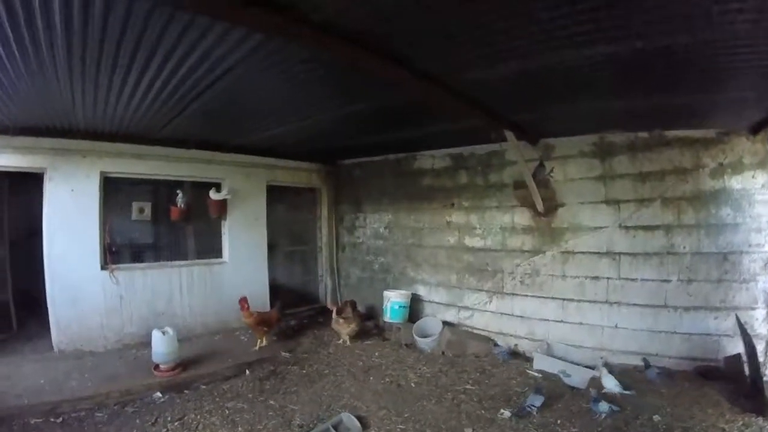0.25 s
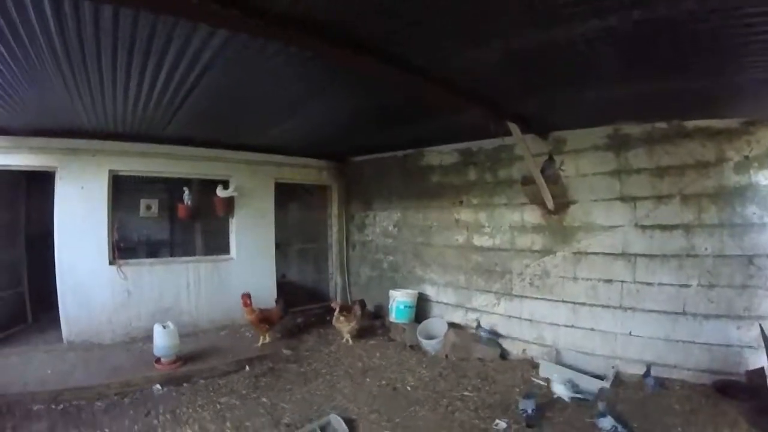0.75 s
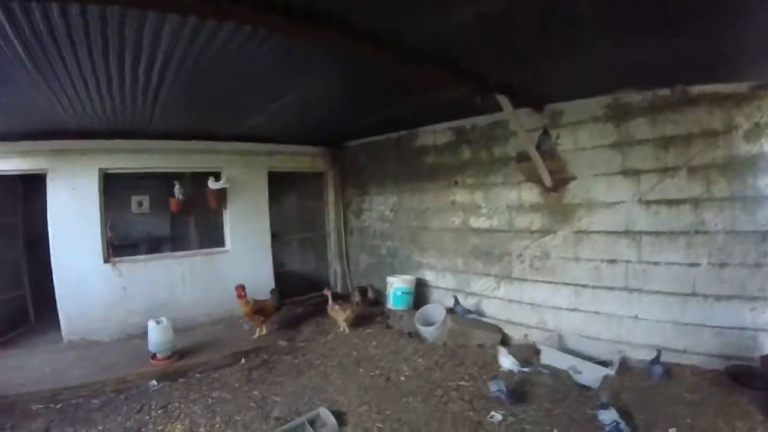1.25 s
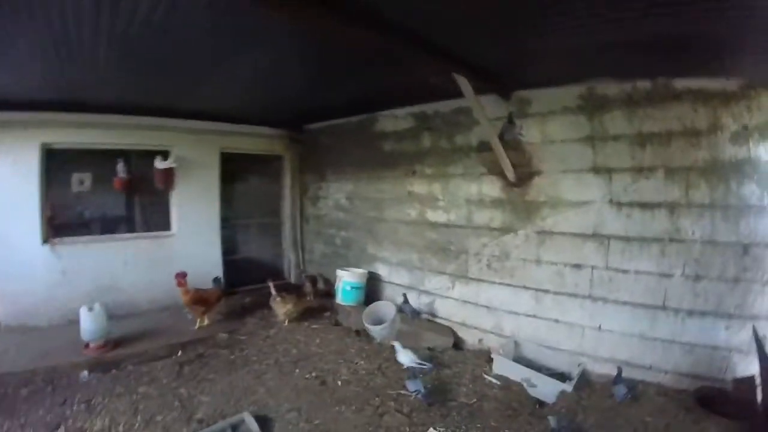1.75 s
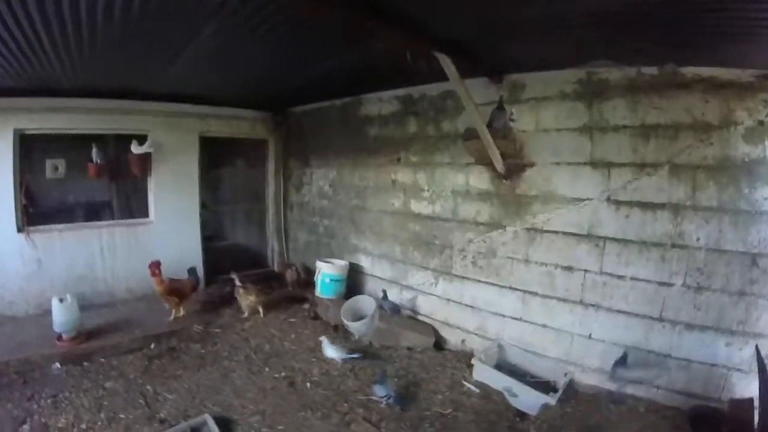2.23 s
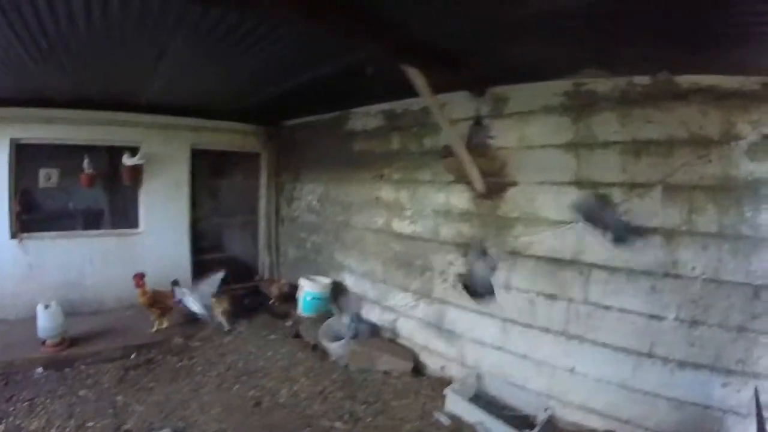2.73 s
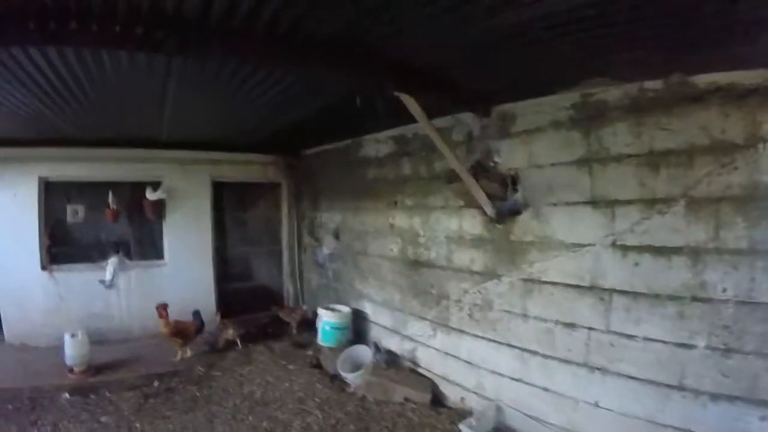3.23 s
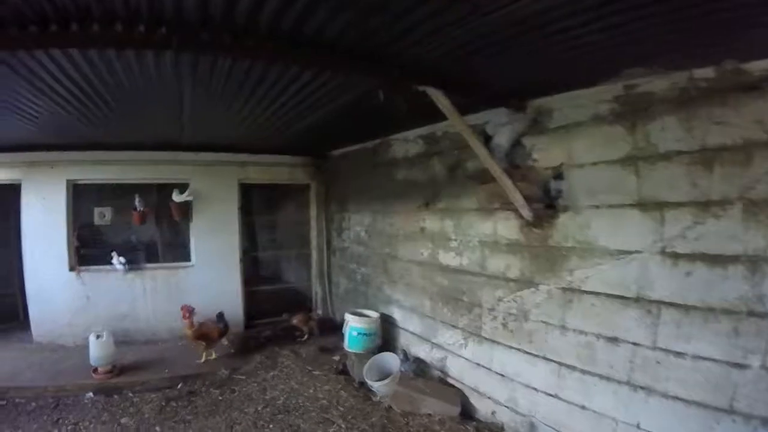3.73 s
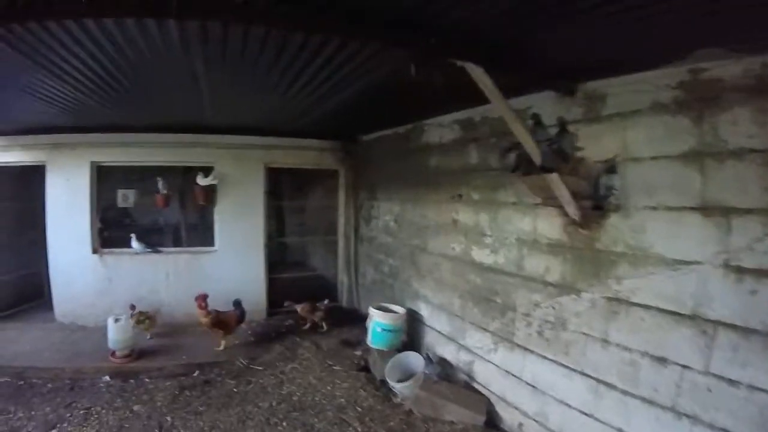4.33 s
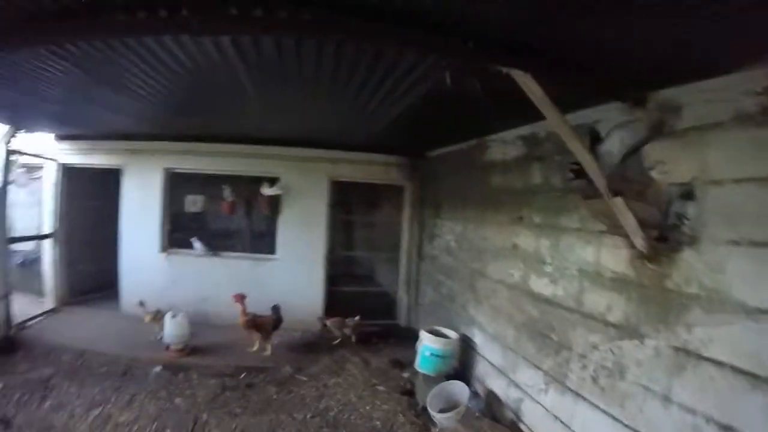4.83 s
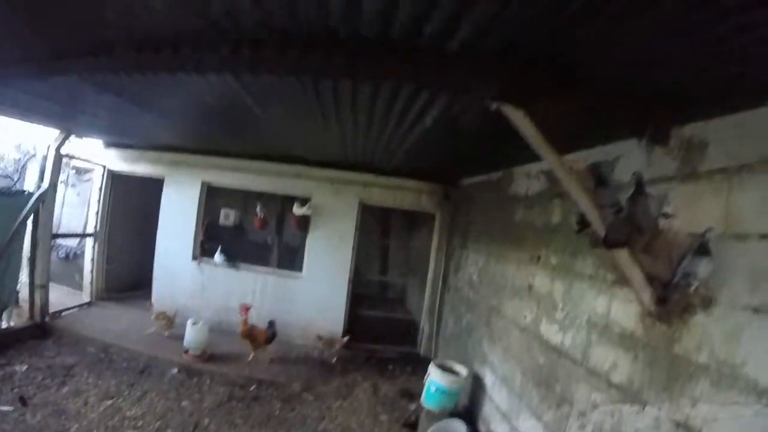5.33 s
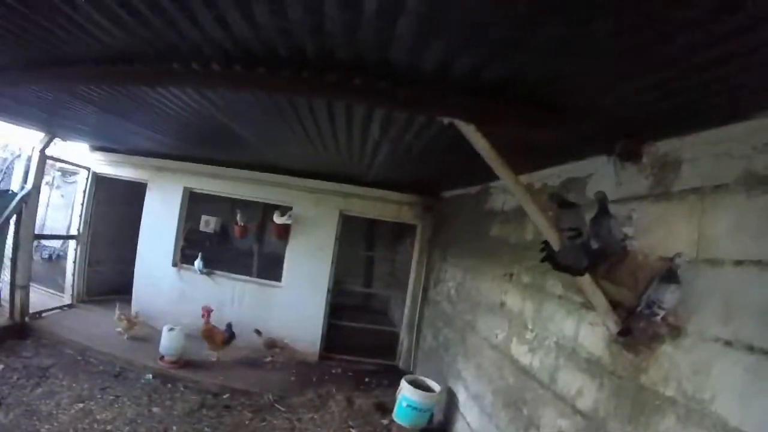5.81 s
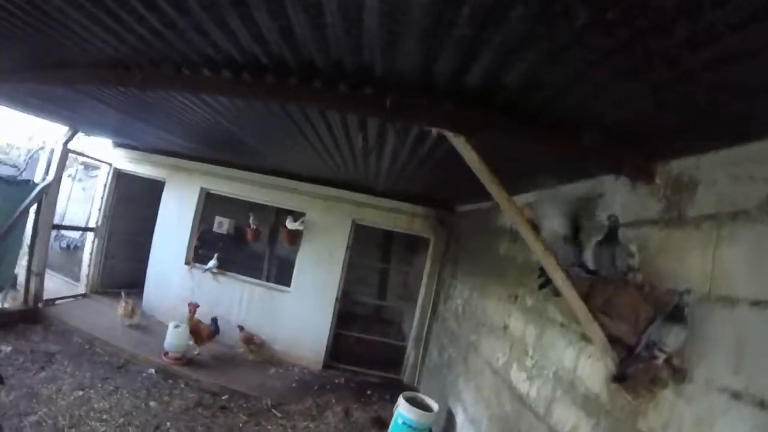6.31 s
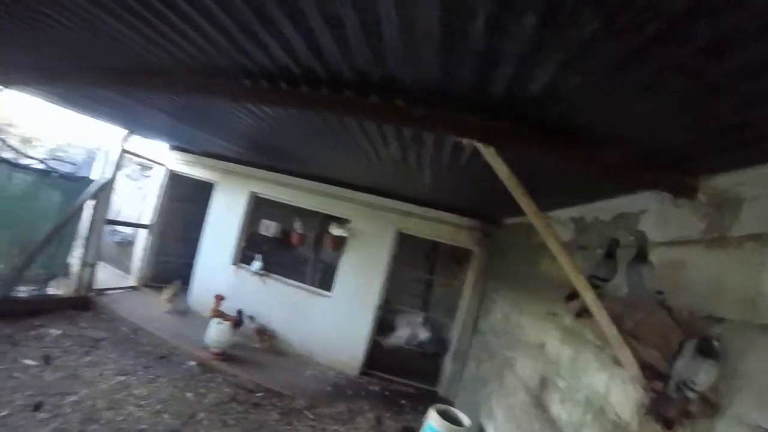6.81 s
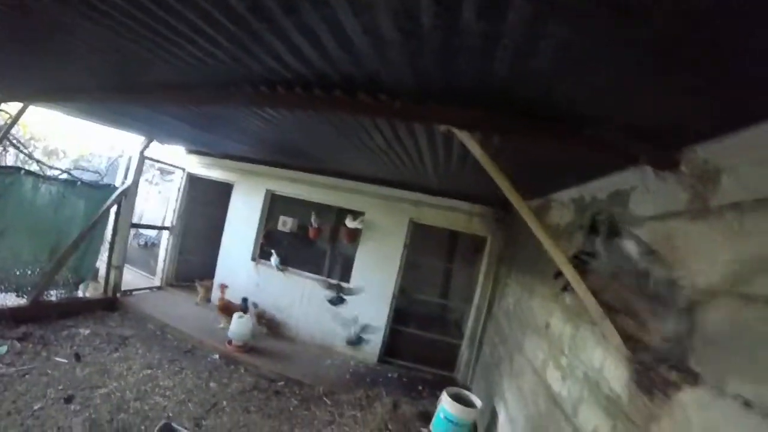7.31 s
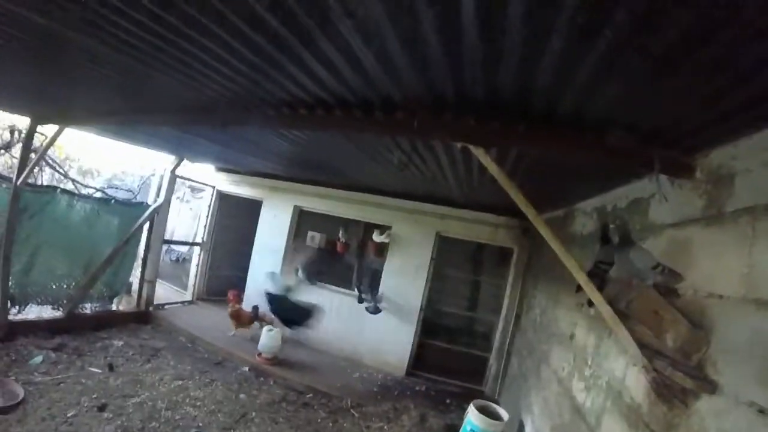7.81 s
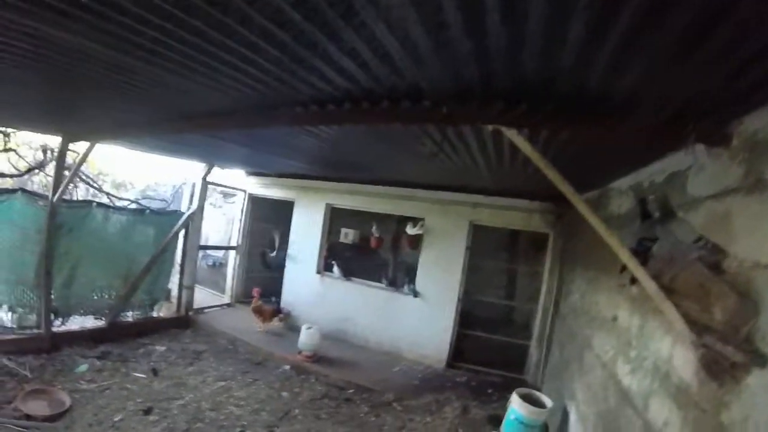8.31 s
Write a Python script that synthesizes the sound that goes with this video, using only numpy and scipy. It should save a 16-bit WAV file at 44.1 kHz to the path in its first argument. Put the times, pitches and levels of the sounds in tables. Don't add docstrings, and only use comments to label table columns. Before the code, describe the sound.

Quiet hum and faint ticks, then a rush of flapping pigeon wings, a lull with scratches and soft grunts, and a closer, heavier flurry thumping the microphone.

```python
import sys
import numpy as np
from scipy import signal
from scipy.fft import rfft, irfft
from scipy.io import wavfile
from scipy.ndimage import uniform_filter1d

SR = 44100
rng = np.random.default_rng(int(sys.argv[2]) if len(sys.argv) > 2 else 0)


def invert_db(x):
    u = np.asarray(x, float) / 20
    return 10 ** u


def wrap_up_sound(samples):
    columns = np.atleast_2d(samples).T
    tamed = np.clip(columns, -1, 1)
    steps = np.round(tamed * 32767).astype(np.int16)
    wavfile.write(sys.argv[1], SR, steps)


N = 377055


def at_hz(points, hz):
    point_hz, point_db = np.transpose(points)
    return np.interp(np.log(hz + 1), np.log(point_hz), point_db)


def band(x, low_hz, high_hz, order=2):
    edges_hz = [low_hz, min(high_hz, 0.45 * SR)]
    return signal.sosfilt(signal.butter(order, edges_hz, "band", fs=SR, output="sos"), x)


def colour(x, curve):
    n = x.shape[-1]
    return irfft(rfft(x) * invert_db(at_hz(curve, np.fft.rfftfreq(n, 1 / SR))), n)


def housed(x):
    # pitch_hz, level_db [dB per Hz]
    housing_curve = [(20, 3), (100, -1), (160, -8), (480, -9), (800, -5.5), (950, -6.5), (1150, -22),
                     (1400, -24.5), (2200, -17), (2900, -32), (3750, -28.5), (8200, -36.5), (9500, -42),
                     (13000, -41), (15500, -51)]
    return colour(x, housing_curve)


def drift(rate_hz):
    knots_per_s = 200
    knots = rng.standard_normal(int(N / SR * knots_per_s) + 202)
    smooth = signal.butter(1, min(rate_hz, 90), fs=knots_per_s, output="sos")
    slow = signal.sosfiltfilt(smooth, knots)[100:-100]
    return np.interp(np.arange(N) / SR * knots_per_s, np.arange(len(slow)), slow / slow.std())


def swell(t, rise_s, t60_s):
    rise = np.sin(np.pi / 2 * np.clip(t / rise_s, 0, 1)) ** 2
    return rise * invert_db(-60 * np.maximum(t - rise_s, 0) / t60_s)


def hump(t, length_s, skew):
    return np.sin(np.pi * (t / length_s) ** skew)


def seconds(length_s):
    return np.arange(int(length_s * SR)) / SR


def add(out, s, sound, peak_db):
    i = max(round(s * SR), 0)
    out[i:i + len(sound)] += (invert_db(peak_db) * sound / np.abs(sound).max())[:N - i]


def strokes():
    # middle_s, peak_db, boom_hz, body_db [re boom], length_s
    take_off = [(2.208, -20.5, 776, -33, 0.014), (2.292, -35, 843, -12, 0.021),
                (2.319, -26.5, 810, -14, 0.014), (2.33, -28, 906, -22, 0.015),
                (2.366, -20.5, 700, -30, 0.014), (2.386, -30, 770, -5, 0.016), (2.423, -32, 702, -9, 0.027),
                (2.484, -22.5, 748, -27, 0.022), (2.518, -20, 759, -12, 0.016),
                (2.532, -23.5, 785, -19, 0.013), (2.555, -26.5, 814, -15, 0.017),
                (2.57, -30, 820, -18, 0.012), (2.584, -19, 781, -27, 0.021), (2.639, -23, 844, -23, 0.014),
                (2.655, -20.5, 792, -27, 0.019), (2.684, -38, 820, -21, 0.016),
                (2.701, -15.5, 793, -37, 0.032), (2.724, -32, 786, -23, 0.022),
                (2.768, -23.5, 698, -26, 0.017), (2.778, -26.5, 810, -29, 0.019),
                (2.809, -25.5, 750, -23, 0.017), (2.873, -30, 809, -8.5, 0.03),
                (2.885, -31, 818, -13, 0.016), (2.919, -28.5, 818, -12.5, 0.034),
                (2.956, -37, 766, -21, 0.015), (2.999, -30, 791, -16, 0.015), (3.042, -30, 743, -18, 0.012),
                (3.109, -33, 735, -15, 0.014), (3.138, -28.5, 812, -22, 0.017),
                (3.147, -28.5, 815, -17, 0.011), (3.177, -32, 795, -22, 0.011),
                (3.246, -32.5, 850, -15, 0.021), (3.259, -33, 826, -4.5, 0.012),
                (3.269, -35, 782, -12, 0.017), (3.297, -39, 789, 4, 0.01), (3.422, -25.5, 741, -22, 0.012),
                (3.481, -33, 824, -9, 0.016), (3.597, -25.5, 841, -28, 0.018),
                (3.771, -34.5, 687, -18, 0.022), (3.886, -37.5, 737, -11, 0.012)]
    fly_past = [(6.344, -22.5, 883, -24, 0.024), (6.355, -27, 875, -19, 0.012),
                (6.45, -14.5, 851, -22, 0.022), (6.469, -23, 872, -29, 0.023),
                (6.505, -26, 826, -8.5, 0.014), (6.524, -24, 802, -5.5, 0.01),
                (6.64, -26.5, 771, -1.5, 0.012), (6.863, -32, 838, -13, 0.018),
                (6.947, -33, 867, -16, 0.015), (6.975, -29, 830, -10.5, 0.011),
                (7.038, -32, 756, -16, 0.011), (7.092, -28, 647, -15, 0.013), (7.172, -39, 758, -21, 0.013),
                (7.22, -24.5, 790, -27, 0.03), (7.286, -30, 753, -16, 0.022), (7.311, -32, 820, -18, 0.012),
                (7.332, -28.5, 785, -16, 0.013), (7.347, -32, 781, -15, 0.017),
                (7.379, -26, 821, -9, 0.022), (7.432, -32.5, 860, -23, 0.012),
                (7.45, -25.5, 847, -9.5, 0.013), (7.499, -25, 713, -12, 0.011),
                (7.509, -19, 790, -25, 0.011), (7.531, -21.5, 702, -17, 0.013),
                (7.551, -27, 824, -21, 0.019), (7.566, -28, 842, -5, 0.026),
                (7.614, -19.5, 823, -25, 0.011), (7.619, -23, 763, -26, 0.017),
                (7.663, -27, 700, -9, 0.011), (7.668, -26, 737, -18, 0.011), (7.687, -21, 855, -23, 0.012),
                (7.703, -35, 817, -14, 0.028), (7.727, -21.5, 810, -28, 0.022),
                (7.761, -35, 803, -15, 0.026), (7.785, -27, 770, -15, 0.012),
                (7.804, -27.5, 897, -11, 0.021), (7.841, -30, 739, -20, 0.017),
                (7.976, -34, 750, -7, 0.014), (8.077, -29.5, 766, -12, 0.012), (8.19, -31, 682, -21, 0.017)]
    # middle_s, peak_db, boom_hz, body_db [re boom], length_s
    flicks = [
        (.532, -35.5, 603, -14, .04),
        (0.542, -34.5, 807, -16, .014),
        (1.042, -38, 718, -7, .016),
        (1.298, -33.5, 774, -10, 0.022),
        (1.76, -37, 843, -16, .02),
        (1.81, -32, 800, -17, .01),
        (1.821, -37, 794, -12, .012),
              (2.357, -27, 760, -20, .018), (2.469, -27.5, 780, -20, .018),
                (3.977, -38.5, 806, -12, .027), (4.024, -40, 730, -14, .013), (4.09, -30, 798, -25, .034),
                (4.201, -36, 822, -16, .012), (4.224, -35, 830, -16, .014), (4.273, -33, 789, -15, .017),
                (4.352, -36, 840, -22, .025), (4.383, -31, 729, -23, .034), (4.901, -29, 658, -20, .021),
                (5.197, -27.5, 814, -28, .024), (5.225, -38, 713, -15, .02)]
    landing = [
        (8.319, -36.5, 693, -26, 0.047),
        (8.433, -35, 688, -15, .03),
        (8.454, -35, 735, -21, .03),
        (8.529, -39, 758, -7, 0.032),
    ]
    rows = take_off + fly_past + flicks + landing
    out, t = np.zeros(N), np.arange(4096) / SR
    air = housed(rng.standard_normal((len(rows), 3, len(t))))
    for (middle_s, db, hz, body_db, length_s), (boom_air, body_air, rustle_air) in zip(rows, air):
        length_s = 1.2 * length_s
        start_s = middle_s - 0.5 * length_s
        shape = np.sin(np.pi * np.minimum(t / length_s, 1)) ** 3
        rough = band(boom_air, hz - 150, hz + 150)
        phase = 2 * np.pi * hz * t * (1 + 0.022 * (1 - t / length_s))
        boom = np.sin(phase) + 0.22 * rough / rough.std()
        add(out, start_s, boom * shape, db - 0.5)
        add(out, start_s, band(body_air, 169, 514) * shape, db + body_db + 9.0)
        add(out, start_s, band(rustle_air, 1000, 3600) * shape, db - 12.5)
    return out


def ticks():
    # start_s, peak_db
    claps = [(2.2062, -24.5), (2.429, -32), (2.4766, -28.5), (2.8338, -38), (2.8958, -31), (3.1448, -37),
             (3.176, -32.5), (3.3708, -35.5), (3.6533, -32.5), (3.7674, -41), (3.8695, -37), (6.5, -26),
             (6.525, -23), (6.6382, -20.5), (6.7541, -33), (6.838, -28.5), (6.87, -34), (7.0605, -38),
             (7.459, -25), (7.4881, -14), (7.575, -28.5), (7.753, -31.5), (7.8034, -34), (8.176, -44)]
    # start_s, peak_db
    knocks = [
        (2.315, -30.5),
        (3.023, -37.5),
        (3.105, -34.5),
        (3.429, -36),
        (3.5396, -34.5),
        (4.232, -41),
        (4.7741, -48),
    ]
    # start_s, peak_db
    scratches = [(2.3337, -28), (2.385, -29), (2.7673, -24.5), (3.97, -34), (4.016, -39), (4.0583, -40),
                 (4.0797, -30.5), (4.125, -35.5), (4.169, -42), (4.208, -40), (4.272, -38.5), (4.51, -41.5),
                 (4.5488, -35), (6.3642, -38), (6.4424, -16.5), (6.944, -36), (7.638, -30.5), (7.6794, -23)]
    # start_s, peak_db
    snaps = [
        (2.6044, -33),
        (2.653, -28.5),
        (2.951, -40),
        (3.636, -44),
        (4.344, -40),
        (7.379, -17.5),
    ]
    # start_s, peak_db
    swishes = [
        (1.724, -34.5),
        (7.312, -30),
        (7.333, -24.5),
        (7.3533, -25),
        (7.3735, -28),
        (7.396, -31),
        (8.008, -33.5),
    ]
    # low_db [re peak], top_db [re peak], t60_s
    kinds = [
        (-2.5, -28, 0.03),
        (5.5, -23, 0.042),
        (-8.5, -35, .045),
        (-13, -13, 0.036),
        (-9, -20, 0.048),
    ]
    rows = []
    for hits, kind in zip([claps, knocks, scratches, snaps, swishes], kinds):
        rows += [(*hit, *kind) for hit in hits]
    out, t = np.zeros(N), np.arange(4000) / SR
    air = housed(rng.standard_normal((len(rows), 3, len(t))))
    grain = uniform_filter1d(rng.standard_normal((len(rows), len(t))), size=49) * 7
    for (s, db, low_db, top_db, t60_s), (middle_air, top_air, low_air), crackle in zip(rows, air, grain):
        rise_s = max(0.2 * t60_s - 0.002, 0.0006)
        shape = swell(t, rise_s, max(t60_s, 0.004)) * invert_db(3.65 * crackle)
        add(out, s - 0.6 * rise_s, band(middle_air, 2580, 11050) * shape, db - 2.5)
        add(out, s - 1.2 * rise_s, band(top_air, 6800, 14600) * shape, db + top_db + 7.0)
        add(out, s - 0.598 * rise_s, band(low_air, 1794, 2430) * shape, db + low_db - 2.5)
        knock = band(low_air, 240, 1230) * swell(t, 0.00089, 0.012)
        add(out, s - 0.599 * rise_s, knock, db + low_db - 0.5)
    return out


def grunts():
    # start_s, peak_db, pitch_hz, length_s, fall [share of pitch lost]
    throat_notes = [
        (5.711, -40.5, 786, 0.015, -0.00074),
        (5.73, -39.5, 890, 0.019, .05),
        (5.808, -27.5, 733, 0.032, 0.2),
        (5.935, -24, 684, 0.027, 0.036),
        (5.948, -24, 640, 0.018, 0.17),
        (5.966, -30, 610, 0.023, 0.08),
        (6.077, -28.5, 720, 0.013, 0.037),
        (6.089, -32.5, 584, 0.023, -0.003),
        (6.209, -28.5, 668, 0.028, -.08),
        (6.225, -34, 608, 0.029, 0.049),
    ]
    # start_s, peak_db, pitch_hz, length_s
    sac_hums = [
        (4.896, -35, 318, 0.019),
        (5.711, -38, 390, 0.038),
        (5.812, -36.5, 341, 0.038),
        (5.951, -33.5, 360, 0.037),
        (6.116, -39.5, 272.3, 0.05),
        (6.222, -36.5, 403, 0.074),
    ]
    housing_hz, housing_db = 900, -8.5
    out = np.zeros(N)
    air = rng.standard_normal((len(throat_notes), 2, 6000))
    for (s, db, hz, length_s, fall), breath in zip(throat_notes, air):
        t = seconds(length_s)
        waver = band(breath, 13, 100)[:, -len(t):]
        main, housing_waver = 1 + 0.25 * waver / waver.std()
        tone = main * np.sin(2 * np.pi * hz * (t - fall / 2 * t ** 2 / length_s))
        tone = tone + invert_db(housing_db) * housing_waver * np.sin(2 * np.pi * housing_hz * t)
        add(out, s - 0.002, tone * hump(t, length_s, 0.59), db + 0.5)
    sighs = band(rng.standard_normal((len(sac_hums), 6000)), 20, 90)
    for (s, db, hz, length_s), sigh in zip(sac_hums, sighs / sighs.std()):
        t = seconds(length_s)
        hum = (1 + 0.5 * sigh[-len(t):]) * np.sin(2 * np.pi * hz * t)
        add(out, s, hum * hump(t, length_s, 0.45), db - 0.5)
    return out


def pushes():
    # start_s, peak_db
    gusts = [(2.298, -33.5), (2.474, -37), (2.806, -33), (3.91, -29.5), (6.366, -31), (6.499, -32),
             (6.524, -39), (6.69, -31), (6.733, -25), (6.804, -35), (6.922, -24), (7.273, -26), (7.51, -23),
             (7.611, -20), (7.698, -25), (7.775, -32), (7.907, -24.5), (8.02, -20), (8.132, -26),
             (8.247, -34), (8.373, -30)]
    out, push_hz = np.zeros(N), 48.4
    u = np.linspace(-3, 3, int(1.6 * SR / push_hz))
    for s, db in gusts:
        add(out, s, -u * np.exp(-u ** 2 / 2), db - 7.0)
    return out


def rings():
    # start_s, peak_db, pitch_hz, length_s
    plastic_notes = [(0.01, -60, 3760, 0.18), (3.955, -44, 4070, .01), (3.985, -44, 6300, .012),
                     (4.056, -43, 6000, .014), (4.086, -42, 3850, .016), (4.169, -46, 4200, 0.013),
                     (2.333, -34, 3920, 0.0068), (0.514, -41, 1770, 0.033), (2.9, -44, 6060, .015),
                     (3.968, -37, 4150, 0.008), (3.972, -43, 6000, .012), (3.973, -37, 2163, 0.024),
                     (4.014, -36, 4090, 0.01), (4.014, -40.5, 5080, 0.017), (4.204, -32, 2046, 0.016),
                     (4.232, -43, 4600, 0.0098), (4.272, -43, 5180, 0.012), (4.545, -46, 4022, 0.011),
                     (6.333, -22.5, 949, 0.047), (1.805, -34, 2320, 0.0068), (5.093, -40, 6940, 0.0075),
                     (6.439, -31, 6650, 0.0064), (6.503, -31, 3660, 0.0087)]
    # start_s, peak_db, pitch_hz
    whirs = [(2.325, -32, 2140), (2.889, -41, 2060), (3.102, -41, 2070), (3.176, -38, 2130),
             (3.261, -38, 1953), (3.648, -41, 2132), (3.708, -36, 2135), (4.083, -37.5, 2120),
             (6.411, -39, 2198), (6.496, -28, 2267), (6.863, -33, 1980), (7.343, -35, 2183),
             (7.455, -27, 2030), (7.499, -40, 2116), (7.609, -32, 2126), (7.721, -39, 2229),
             (7.794, -37, 2059), (1.721, -41, 2300)]
    whir_s = 0.016
    rows = plastic_notes + [(*whir, whir_s) for whir in whirs]
    out = np.zeros(N)
    air = rng.standard_normal((len(rows), 9000))
    for (s, db, hz, length_s), noise in zip(rows, air):
        t = seconds(length_s)
        width_hz = 45 + 2.2 / length_s
        note = band(noise, hz - width_hz, hz + width_hz, order=1)[-len(t):]
        tone = note / note.std() + 1.54 * np.sin(2 * np.pi * hz * t)
        add(out, s, tone * hump(t, length_s, 0.82), db)
    return out


def scuffs():
    # start_s, peak_db, low_hz, high_hz, length_s
    thuds = [(1.278, -30.5, 119, 517, 0.067), (1.475, -33, 130, 600, 0.062), (1.806, -34, 200, 600, 0.022),
             (2.301, -35, 255, 466, 0.18), (3.932, -37.5, 135, 360, 0.11), (4.118, -39.5, 90, 300, .1),
             (4.502, -43.5, 124, 344, 0.29), (6.115, -38.5, 230, 607, 0.06), (6.33, -34.5, 101, 448, .37),
             (6.633, -37, 282, 520, 0.044), (7.502, -32.5, 280, 483, 0.31)]
    # start_s, peak_db, low_hz, high_hz, length_s
    rasps = [(6.234, -44, 1500, 6000, 0.18), (7.647, -30, 600, 1200, 0.046),
             (4.535, -44.5, 3300, 4300, .04), (4.56, -50, 6000, 11000, .03),
             (4.045, -44, 3500, 12000, 0.051), (0.838, -56.5, 3900, 6400, 0.33),
             (4.053, -39, 1160, 1730, 0.058), (4.34, -33.5, 513, 1690, 0.074),
             (5.18, -39, 1200, 2000, .045), (4.65, -56, 6000, 15000, .35),
             (4.764, -40.5, 1800, 14000, 0.064), (4.801, -49.5, 1900, 2620, 0.23),
             (5.12, -48, 3000, 15000, 0.13), (5.19, -34, 440, 1080, .07), (5.235, -47.5, 2000, 5100, 0.12),
             (6.118, -30.5, 700, 2300, 0.055), (7.057, -34.5, 970, 2000, 0.043)]
    out = np.zeros(N)
    air = housed(rng.standard_normal((len(thuds + rasps), 16384)))
    for (s, db, low_hz, high_hz, length_s), noise in zip(thuds + rasps, air):
        t = seconds(length_s)
        add(out, s, band(noise, low_hz, high_hz)[-len(t):] * hump(t, length_s, 0.66), db)
    return out


def scrabbles():
    # start_s, length_s, peak_db
    scrambles = [
        (3.966, 0.035, -42.5),
        (4.045, 0.047, -41.5),
    ]
    # pitch_hz, level_db, t60_s
    trough = [(3810, 6, 0.018), (4500, -6, .011), (5200, -17, 0.0097), (6000, 0, 0.0098), (6800, 7, 0.0073),
              (8300, 2, 0.0071)]
    slips_per_s = 1100
    out, t = np.zeros(N), np.arange(6000) / SR
    for s, length_s, db in scrambles:
        draws = rng.random((len(trough), 3, len(t)))
        slipping = draws[:, 0] < slips_per_s / len(trough) / SR
        slips = slipping * invert_db(-12 * draws[:, 1]) * (t < length_s)
        sound = 0
        for (hz, mode_db, t60_s), clicks in zip(trough, slips):
            r, w = invert_db(-60 / (t60_s * SR)), 2 * np.pi * hz / SR
            ring = signal.lfilter([0, np.sin(w)], [1, -2 * r * np.cos(w), r * r], clicks + 1e-18)
            sound = sound + invert_db(mode_db) * ring
        add(out, s, sound, db)
    return out


def grit():
    # start_s, peak_db, low_hz, high_hz
    grains = [(2.516, -21, 150, 1200), (0.466, -42, 3500, 15500), (0.5427, -41, 7600, 15500),
              (0.679, -31.5, 1920, 16000), (0.7797, -40, 2800, 16000), (0.785, -43, 3000, 11000),
              (.8435, -51, 6000, 14000), (.892, -46, 1900, 2500), (0.937, -40, 1900, 4500),
              (0.936, -43, 7000, 16000), (1.3848, -43, 8000, 16000), (1.696, -42, 5200, 7000),
              (1.714, -32.5, 2100, 3600), (1.713, -43, 8500, 15900), (1.72, -32, 2100, 4500),
              (1.719, -38.5, 8000, 16000), (1.726, -37, 1800, 14000), (1.806, -27, 2170, 5000),
              (1.8065, -29.5, 7950, 16000), (1.811, -33.5, 2200, 9000), (3.297, -33, 100, 900),
              (4.724, -42, 3000, 13000), (4.776, -41.5, 9000, 15500), (4.795, -47, 8000, 15000),
              (4.885, -44, 3000, 15000), (4.958, -40, 3030, 15500), (5.0269, -44, 7500, 14000),
              (5.0675, -38, 1900, 15500), (5.0718, -41, 2990, 15500), (5.0944, -43, 5000, 13000),
              (5.24, -47, 5000, 12000), (5.41, -50, 4000, 11500), (5.712, -45, 3000, 15000),
              (6.1718, -42, 5000, 15500), (6.2711, -47, 6000, 15500), (6.3981, -37, 5000, 15000),
              (6.9074, -43, 6000, 12000), (6.9923, -43, 4000, 13000), (7.9266, -43, 5000, 14000),
              (8.5113, -45, 5000, 14000)]
    out, t = np.zeros(N), np.arange(1024) / SR
    air = housed(rng.standard_normal((len(grains), len(t))))
    for (s, db, low_hz, high_hz), noise in zip(grains, air):
        add(out, s, band(noise, low_hz, high_hz) * swell(t, 0.00097, t60_s=0.012), db)
    return out


def far_puffs(per_s):
    out, t = np.zeros(N), np.arange(1100) / SR
    draws = rng.random((600, 3))
    for when, pitch, size in draws[:int(per_s * N / SR)]:
        boom = np.sin(2 * np.pi * (580 + 400 * pitch) * t)
        add(out, when * N / SR, boom * np.hanning(len(t)), -12 * size)
    return out / out.std()


def flurry():
    # start_s, bustle_db [wings], wash_db [pushed-down air at the microphone]
    flock = [(0, -66.5, -49), (1.24, -62.5, -53), (2.07, -62.5, -53.5), (2.26, -56, -47), (2.4, -46, -40),
             (2.6, -44, -40), (3.14, -50, -40.5), (3.74, -53, -41.5), (3.93, -57, -48.5),
             (4.31, -59.5, -55.5), (5.1, -59.5, -54), (5.4, -65, -55.5), (6.14, -59.5, -53),
             (6.36, -48, -51), (6.55, -53, -36.5), (7.25, -52.5, -41), (7.5, -44, -33.5),
             (8.55, -59.5, -46)]
    s, bustle_db, wash_db = np.transpose(flock)
    bustle = np.interp(np.arange(N) / SR, s, bustle_db)
    wash = np.interp(np.arange(N) / SR, s, wash_db)
    swing = bustle + 55
    boom = -44 + 0.85 * swing
    hiss = -59.5 + 0.73 * swing
    busy = np.clip((boom + 62.5) / 14, 0.2, 1.3)
    boom = boom + np.clip(boom + 43.5, -9, 0)
    # level, low Hz, high Hz, shared throb dB, own throb dB
    layers = [(wash, 18, 150, 0.71, 1.6), (boom, 150, 1250, 1.86, 0.44),
              (bustle, 1250, 2950, 1.77, 0.91), (hiss, 2950, 16000, 1.47, 0.5)]
    noise, shared = housed(rng.standard_normal((4, N))), drift(22)
    out = invert_db(boom - 13.0) * far_puffs(45)
    for air, (level, low_hz, high_hz, shared_db, own_db) in zip(noise, layers):
        part = band(air, low_hz, high_hz, order=3)
        throb = shared_db * shared + own_db * drift(33)
        out = out + invert_db(level - 1.5 + busy * throb) * part / part.std()
    return out


def coop(x):
    split_hz = 2600
    t = np.maximum(np.arange(12000) / SR - 0.006, 0)
    low, top = rng.standard_normal((2, len(t)))
    low = band(low, 93, split_hz) * swell(t, 0.0025, t60_s=0.24)
    top = invert_db(-2.0) * band(top, split_hz, 14000) * swell(t, 0.001, t60_s=0.14)
    return signal.fftconvolve(x, invert_db(-7) * (low + top) / np.linalg.norm(low))[:N]


def yard():
    # pitch_hz, level_db [dB per Hz]
    hum_curve = [(90, -8.5), (300, -8), (450, -11.5), (700, -5), (880, 0.5), (1050, -12), (1400, -24),
                 (1900, -21.5), (3000, -29.5), (4500, -34.5)]
    hum = band(colour(rng.standard_normal(N), hum_curve), 85, 6500)
    fade_db = 7 * np.exp(-np.arange(N) / SR / 1.32)
    hum_db = -51.5 + fade_db + 1.5 * drift(5.4)
    drone_hz, drone_db = 49.8, -59.5
    drone = band(rng.standard_normal(N), drone_hz - 4, drone_hz + 4, order=1)
    return invert_db(hum_db) * hum / hum.std() + invert_db(drone_db) * drone / drone.std()


def scene():
    wings = strokes()
    birds = ticks() + scuffs() + scrabbles() + grit()
    notes = grunts() + rings()
    echoes = coop(birds + invert_db(-9) * wings + invert_db(-3.5) * notes)
    mix = wings + birds + notes + invert_db(-6.5) * echoes + pushes() + flurry() + yard()
    return mix[None]


def band_limit(x):
    return signal.sosfilt(signal.butter(12, 16490, fs=SR, output="sos"), x)


def record(dry):
    cut = signal.sosfilt(signal.cheby2(14, 45, 15800, fs=SR, output="sos"), dry)
    return band_limit(cut)


dry = scene()
out = record(dry)
wrap_up_sound(out)
```